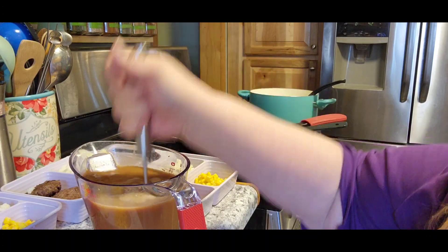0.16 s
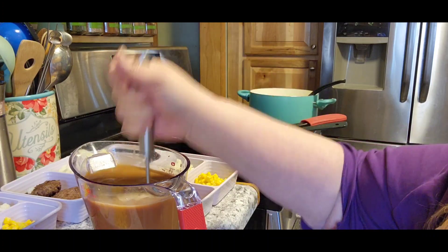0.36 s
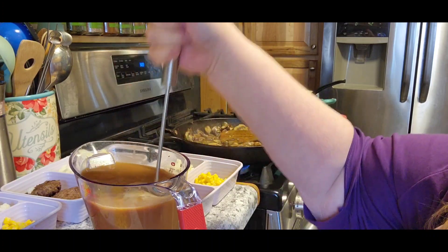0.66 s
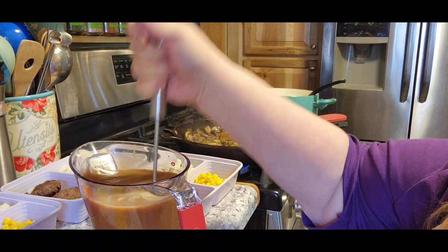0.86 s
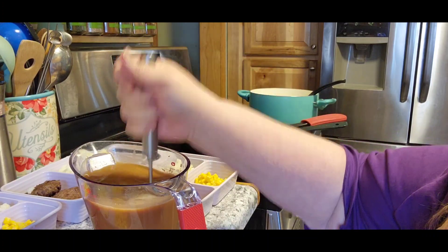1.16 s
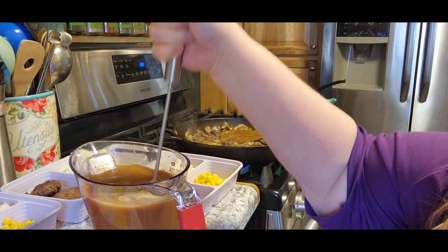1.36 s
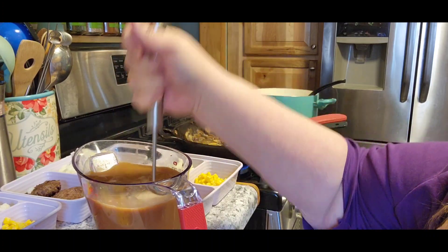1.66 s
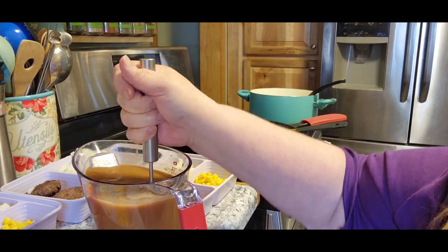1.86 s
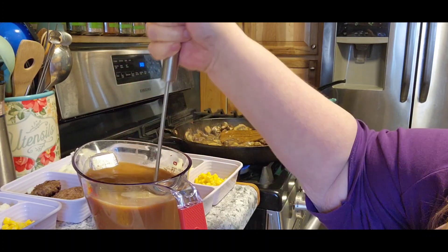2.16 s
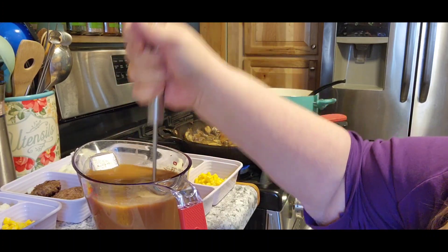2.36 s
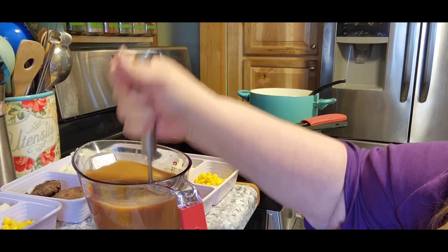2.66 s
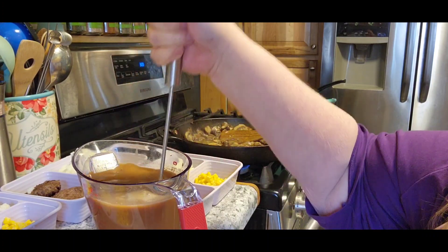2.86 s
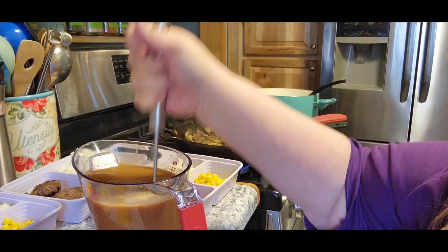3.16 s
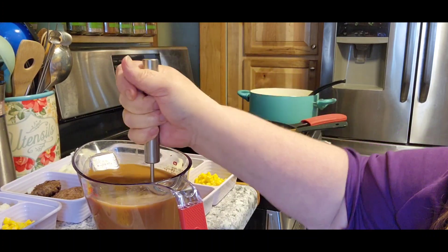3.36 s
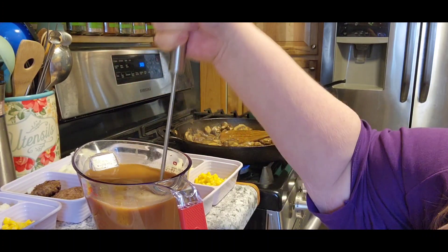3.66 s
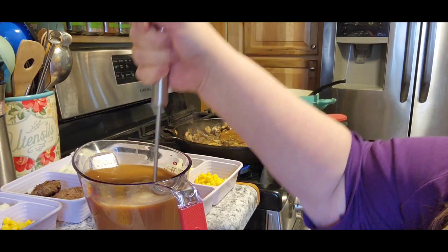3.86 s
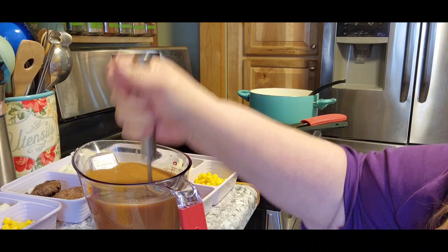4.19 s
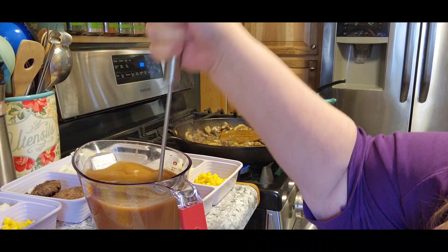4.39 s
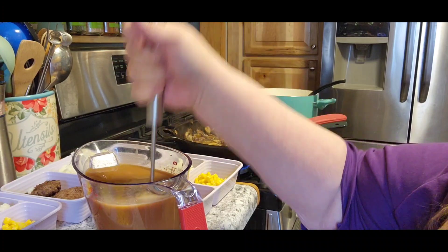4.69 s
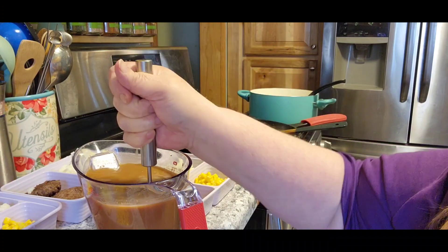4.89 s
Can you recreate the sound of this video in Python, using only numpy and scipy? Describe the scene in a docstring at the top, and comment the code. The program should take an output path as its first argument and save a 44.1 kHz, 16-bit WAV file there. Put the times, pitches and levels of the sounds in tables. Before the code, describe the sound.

A push-down metal whisk works in a glass cup of thin gravy, close to stereo microphones in a small kitchen with a short echo. Right at the start the steel handle hits its top stop with a sharp, briefly ringing clack. These clacks are the loudest sounds and return at about 0.8, 1.6, 2.3, 3.1, 3.9 and 4.7 seconds. After each, the handle is pushed down the spiral shaft with a hissing, chattering rasp, and the spinning wires make a low, wavering drone over the rumble of stirred liquid. Each push ends in a dull knock on the bottom, at about 0.3, 1.2, 1.9, 2.6, 3.4, 4.2 and 4.9 seconds, the last two heavier. Between pushes the spring drives the handle back up with another rasp and light rattles. The sound ends on the seventh push, around five seconds in. An appliance hums faintly throughout.

```python
"""A small kitchen, a stereo pair of microphones close to a glass cup of thin gravy with a push-down whisk.
First the steel handle clacks against its top stop. Pushed down, it rasps along the spiral shaft and spins
the whisk in the liquid, so that cup and counter drone, until the whisk thumps on the bottom. The spring
sends the handle rasping and rattling back up to the next clack. The seventh push ends on the bottom,
five seconds in. Behind it all, an appliance hums faintly."""
import sys
import numpy as np
from scipy import signal
from scipy.fft import rfft, irfft, next_fast_len
from scipy.io import wavfile
from scipy.ndimage import map_coordinates

SR = 44100
rng = np.random.default_rng(int(sys.argv[2]) if len(sys.argv) > 2 else 0)


def pcm_store(signal):
    """Save signal as 16-bit PCM."""
    levels = np.round(np.clip(np.atleast_2d(signal), -1, 1) * 32767)
    wavfile.write(sys.argv[1], SR, levels.astype(np.int16).T)


N = 221778
TIME = np.arange(N) / SR
AGE = np.arange(SR // 2) / SR  # seconds since a blow

# The handle going down. Each row: start in seconds, time to top speed in seconds, hiss in dB,
# swell up to top speed in dB, shaft body in dB, drone in dB.
PUSHES = [(0.176, 0.084, -35.5, 11.5, -34.5, -36), (0.987, 0.15, -35, 6, -34, -29.5),
          (1.75, 0.096, -36, 6.5, -35, -30.5), (2.476, 0.11, -36.5, 3, -35, -32.5),
          (3.232, 0.09, -35, 21.5, -38, -33), (4.086, 0.064, -32, 7, -36, -38.5),
          (4.815, 0.089, -32.5, 13.5, -38, -34.5)]
# The handle springing back up. Each row: start in seconds, hiss in dB, shaft body in dB, drone in dB,
# drone of the coasting whisk in dB.
RETURNS = [(0.495, -33.5, -37, -43.5, -37.5), (1.297, -33.5, -38.5, -39.5, -44.5),
           (2.036, -35, -37, -35, -35.5), (2.785, -33.5, -38, -30, -44.5), (3.546, -33.5, -38, -34, -62),
           (4.323, -33, -35, -33, -45)]
# The spiral catching late in a return. Each row: start in seconds, hiss in dB, shaft body in dB.
CATCHES = [(0.662, -42, -45), (1.438, -53.5, -49), (2.199, -41.5, -50), (2.956, -48, -47),
           (3.704, -43.5, -51.5), (4.498, -39.5, -53.5)]
# The handle hitting its top stop. Each row: start in seconds, level in dB, treble and rebound in dB
# relative to that level, drone in dB.
CLACKS = [(0.0366, -2, -29, -7, -28), (0.81, -3, -32, -6.5, -33.5), (1.624, -0.5, -34, -17.5, -30),
          (2.341, -2, -35, -11.5, -34), (3.1075, -2.5, -45.5, -37, -30.5),
          (3.9274, -0.5, -28.5, -7.5, -27.5), (4.6886, -2, -28, -6, -27.5)]
# The whisk meeting the bottom, once a push. Each row: start in seconds, thud, knock and drone in dB.
THUMPS = [(0.326, -16, -16, -22.5), (1.168, -18.5, -16, -26), (1.896, -14, -15, -37.5),
          (2.638, -20.5, -19.5, -22.5), (3.404, -21, -33.5, -30.5), (4.169, -9, -12.5, -19),
          (4.944, -8.5, -17.5, -29.5)]
# The loose shaft knocking in the handle. Each row: start in seconds, knock in dB, bright scuff in dB.
RATTLES = [(0.174, -36.5, -37), (0.643, -22.5, -48), (0.662, -27.5, -37.5), (0.992, -22.5, -28.5),
           (1.09, -35, -28.5), (1.33, -10.5, -45.5), (1.577, -24, -65), (1.746, -21, -37),
           (2.066, -10, -44), (2.138, -17.5, -43.5), (2.232, -22, -55), (2.476, -19.5, -30),
           (2.579, -26, -24), (2.61, -23, -37), (2.783, -8.5, -35), (3.232, -38.5, -36.5),
           (3.704, -21, -32.5), (4.152, -20, -26.5), (4.349, -12, -32), (4.493, -22.5, -34),
           (4.921, -23, -25.5)]
# The ringing of whisk and cup. Each row: frequency in Hz, level in dB, time to fall 60 dB in seconds,
# left microphone minus right in dB.
WHISK_MODES = [(377.6, -11.5, 0.056, -1.5), (426, -21.5, 0.059, -9), (482, -17.5, 0.098, -3),
               (617, -25, 0.25, 1), (687, -22, 0.14, -7.5), (796, -8.5, 0.086, -1.5), (911, -20.5, 0.1, 17),
               (932, -6.5, 0.062, -3.5), (1057, -13, 0.091, -13.5), (1117, -4, 0.066, 7.5),
               (1241, -3.5, 0.066, 0), (1320, -33, 0.038, 10), (1404, -4, 0.038, -4.5),
               (1485, -6.5, 0.034, -12), (1550, -18, 0.12, 5), (1675, -12.5, 0.052, -13),
               (1870, -9.5, 0.088, 7), (2024, -9, 0.091, 2), (2039, -7.5, 0.052, -4),
               (2178, -17.5, 0.077, 15.5), (2216, -0.5, 0.014, 15.5), (2400, -23, 0.15, 2),
               (2554, -10.5, 0.05, -3.5), (2610, -2.5, 0.023, 3.5), (3000, -14.5, 0.019, 13.5),
               (3590, -27.5, 0.099, 3.5), (3920, -15, 0.023, 5)]
# Resonances of the rubbed steel. Each row: frequency in Hz, width in Hz, level in dB.
SHAFT_MODES = [(365, 78, -9.5), (669, 24.3, 2.5), (787, 26.6, 3), (960, 46, -2), (1095, 90, -5),
               (1532, 41, 4), (1738, 150, -6.5), (2036, 136, -4.5), (2482, 33, -10)]  # the body of the shaft
ROD_MODES = [(3278, 110, 1), (3390, 48, -3.5), (3675, 22, 3), (3813, 60, -3), (4270, 24, -3.5),
             (5340, 68, 0.5), (5610, 120, -2.5), (6350, 47, -15.5), (6300, 15, -9.5), (7200, 130, -5),
             (7490, 77, -4)]  # the thin singing of the rod
# Noise spectra. Each row: frequency in Hz, relative spectral density in dB.
HISS_SPECTRUM = [(300, -16), (900, -34.5), (2300, -10.5), (2950, -3.5), (3450, 4.5), (4000, -0.5),
                 (4700, -1.5), (5500, 2), (6700, -4.5), (7700, -3.5), (9000, -15), (10800, -13.5),
                 (13500, -10), (16000, -20)]  # steel rubbing on steel
FIZZ_SPECTRUM = [(4000, -34.5), (6500, 8), (9000, -1), (10800, -13.5), (13300, 1), (14800, -9),
                 (16000, -5.5)]  # the top of a fast rasp
BLOW_SPECTRUM = [(150, -38), (250, -15.5), (400, -15), (600, -13), (1100, 10.5), (1350, -7), (1700, -22.5),
                 (2080, -5.5), (2600, -5.5), (3050, -17.5), (6000, -19), (10000, -48.5), (16000, -47.5)]  # the crack of a contact
TICK_SPECTRUM = [(800, -16), (2500, 3.5), (4000, -4.5), (7500, 4), (10000, -7.5), (14000, -4), (16000, -22)]  # its bright edge
CLATTER_SPECTRUM = [(230, -25.5), (400, -15), (650, -6), (1100, -9.5), (1700, -8), (2050, 1), (2500, -16),
                    (3000, -16.5), (6000, -22.5), (16000, -62.5)]  # what hangs on after the top stop
THUD_SPECTRUM = [(100, -18.5), (230, -8), (290, -3), (420, -4), (600, -4), (1000, -4), (2500, -44.5)]  # the cup on the counter
RUMBLE_SPECTRUM = [(25, -19), (50, -18.5), (75, -10.5), (100, -2), (125, -6.5), (160, -5.5), (200, -17),
                   (245, -23), (340, -22.5), (600, -26.5), (1500, -44)]  # stirred liquid
AIR_SPECTRUM = [(20, -3.5), (60, -6.5), (130, -5), (200, -0.5), (300, -26), (800, -13.5), (2000, -18),
                (7000, -26.5), (16000, -36)]  # room tone
# How alike the two microphones sound. Each row: frequency in Hz, coherence from 0 to 1.
MIC_COHERENCE = [(25, 1), (60, 0.95), (140, 0.96), (280, 0.88), (600, 0.57), (1500, 0.39), (3000, 0.39),
                 (6000, 0.17), (14000, 0.083)]
# The kitchen's decay. Each row: frequency in Hz, time to fall 60 dB in seconds.
KITCHEN_DECAY = [(120, 0.26), (500, 0.22), (2000, 0.22), (6000, 0.24), (15000, 0.09)]


def top_stop(rebound_s=0.011):
    """The spring throws the handle against its stop: a crack, a rebound, clatter and a ringing whisk."""
    out = np.zeros((2, N))
    contact = 1 - np.exp(-(AGE / 0.0015) ** 2)  # the force builds over a millisecond or two
    for s, db, treble_db, rebound_db, _ in CLACKS:
        crack = amp(-10.5) * burst(BLOW_SPECTRUM, t60=0.039)
        clatter = amp(-20) * burst(CLATTER_SPECTRUM, t60=0.2)
        tick = amp(treble_db) * burst(TICK_SPECTRUM, t60=0.11)
        body = amp(-5.5) * whisk_ring(vary_db=1.2, scatter_rad=0.35, mic_skew_rad=0.42)
        hit = contact * (body + crack + clatter + tick)
        add(out, s, amp(db) * (hit + amp(-12.5) * kitchen_reverb(hit)))
        add(out, s + rebound_s, amp(db + rebound_db) * contact * burst(BLOW_SPECTRUM, t60=0.03))
    return out


def whisk_ring(vary_db, scatter_rad, mic_skew_rad):
    """Whisk and cup ring after a blow; each mode reaches each microphone at its own level and phase."""
    hz, db, t60, pan_db = np.transpose(WHISK_MODES)[:, :, None]
    level, phase, skew = rng.standard_normal((3, len(WHISK_MODES), 1))
    sign = (-1) ** np.arange(len(WHISK_MODES))[:, None]  # neighbouring modes swing opposite ways
    angle = 2 * np.pi * hz * AGE + scatter_rad * phase
    decays = sign * amp(db + vary_db * level) * fade(t60)
    mics = [(decays * amp(side * pan_db / 2) * np.sin(angle + side * mic_skew_rad * skew)).sum(0)
            for side in (1, -1)]
    return np.array(mics) * (1 - np.exp(-AGE / 0.0018))


def spiral_rasp(hiss, body, hiss_db, fizz_db, rod_db, body_db, chatter_db, slips_per_s):
    """The handle rubs along the spiral: steel hiss, singing rod and shaft body, chattering as it turns."""
    chatter = amp(chatter_db * wobble(130) + 0.35 * wobble(30))
    force = chatter * travelling_contact(friction(slips_per_s))
    steel = spread(force, lambda hz: amp(along(HISS_SPECTRUM, hz)))
    rod = spread(force[::-1], lambda hz: resonances(ROD_MODES, hz))
    shaft = spread(force, lambda hz: resonances(SHAFT_MODES, hz))
    speed = np.minimum(hiss / amp(-33.5), 1.2) ** 1.2  # the top octave opens when the stroke is fastest
    fizz = speed * spread(force * amp(2.5 * wobble(150)), lambda hz: amp(along(FIZZ_SPECTRUM, hz)))
    treble = amp(hiss_db) * steel + amp(fizz_db) * fizz + amp(rod_db) * rod
    return hiss * treble + amp(body_db) * body * shaft


def friction(slips_per_s, spike_db=4.5, rub_gain=0.84):
    """Friction force: tiny slips of uneven size over smooth rubbing."""
    slipping = rng.random(N) < slips_per_s / SR
    size = np.minimum(rng.exponential(size=N), 3)
    slips = slipping * amp(spike_db * size) * rng.choice([-1, 1], (2, N))
    return unit(slips) + rub_gain * rng.standard_normal((2, N))


def travelling_contact(force, depth_db=3):
    """Narrow peaks and dips come and go as the contact point travels along the rod."""
    spectra = signal.stft(force, nperseg=1024)[2]
    patch = np.outer(np.hanning(7), np.hanning(11))
    ripple = signal.fftconvolve(rng.standard_normal(spectra.shape[1:]), patch, "same")
    return signal.istft(spectra * amp(depth_db * unit(ripple)), nperseg=1024)[1][:, :N]


def push_levels(ease_db_per_s=35, body_swell=0.65, drone_swell=0.35):
    """Hiss, body and drone gains: the hand speeds up, eases against the spring and stops at the bottom."""
    hiss, body, drone = np.zeros((3, N))
    for (s, rise_s, hiss_db, swell_db, body_db, drone_db), (bottom_s, *_) in zip(PUSHES, THUMPS):
        slow_db = swell_db * np.clip(1 - (TIME - s) / rise_s, 0, 1)
        ease_db = ease_db_per_s * np.maximum(TIME - s - rise_s, 0)
        travel_s = bottom_s - s
        hiss += amp(hiss_db - slow_db - ease_db) * envelope(s, 0.16, travel_s, release_s=0.031)
        body += amp(body_db - body_swell * slow_db) * envelope(s, 0.24, travel_s, release_s=0.137)
        drone += amp(drone_db - drone_swell * slow_db) * envelope(s, 0.12, travel_s, release_s=0.34)
    return hiss, body, drone


def return_levels(hold_s=0.065, gather_s=0.028, gather_db=2.5):
    """Hiss and body gains: the spring starts the handle at once, then it slows and catches near the top."""
    hiss, body = np.zeros((2, N))
    for s, hiss_db, body_db, *_ in RETURNS:
        slow_db = gather_db * np.clip(1 - (TIME - s) / gather_s, 0, 1)
        hiss += amp(hiss_db - slow_db) * envelope(s, attack_s=0.058, hold_s=hold_s, release_s=0.25)
        body += amp(body_db - 2.4 * slow_db) * envelope(s, attack_s=0.063, hold_s=hold_s, release_s=0.31)
    for s, hiss_db, body_db in CATCHES:
        hiss += amp(hiss_db) * envelope(s, attack_s=0.042, hold_s=0.013, release_s=0.13)
        body += amp(body_db) * envelope(s, attack_s=0.063, hold_s=0.013, release_s=0.18)
    return hiss, body


def bottom_thumps():
    """The end of each push knocks the shaft and goes through the cup into the counter as a dull thud."""
    out = np.zeros((2, N))
    for s, thud_db, knock_db, _ in THUMPS:
        thud = amp(thud_db - 12) * burst(THUD_SPECTRUM, t60=0.067) * (1 - np.exp(-AGE / 0.004))
        add(out, s, thud + shaft_knock(knock_db))
    return out


def shaft_rattles():
    """Play between shaft and handle gives light knocks and scuffs as the spiral catches and lets go."""
    out = np.zeros((2, N))
    for s, knock_db, scuff_db in RATTLES:
        scuff = amp(scuff_db) * burst(TICK_SPECTRUM, t60=0.049) * (1 - np.exp(-AGE / 0.0012))
        add(out, s, shaft_knock(knock_db) + scuff)
    return out


def shaft_knock(db):
    """One light contact between shaft and handle, briefly ringing the whisk."""
    body = whisk_ring(vary_db=2.5, scatter_rad=1.2, mic_skew_rad=0.5) * fade(0.17)
    return amp(db) * (amp(-13.5) * body + amp(-19.5) * burst(BLOW_SPECTRUM, t60=0.06))


def churn(drone_hz=125, waver=0.0238, sag=0.1477, press_s=0.01515, return_lag_s=0.02, coast_s=0.2):
    """The turning wires keep cup and counter droning over the rumble of stirred liquid."""
    stirred = push_levels()[2]
    for s, *_, db, coast_db in RETURNS:
        stirred += amp(db) * envelope(s + return_lag_s, attack_s=0.12, hold_s=0.015, release_s=0.37)
        stirred += amp(coast_db) * envelope(s + coast_s, attack_s=0.34, hold_s=0.02, release_s=0.39)
    for s, *_, db in CLACKS:
        stirred += amp(db) * envelope(s, attack_s=0.057, hold_s=0.035, release_s=0.36)
    pressed, drag = np.zeros((2, N))
    for s, *_, db in THUMPS:  # pressed on the bottom, the whisk drones louder and slows
        pressed += amp(db) * envelope(s, attack_s=0.12, hold_s=0.004, release_s=0.2)
        drag += np.exp(-((TIME - s - 0.008) / press_s) ** 2)
    pitch_hz = drone_hz * (1 + waver * wobble(22) - sag * drag)
    drone = np.sin(2 * np.pi * np.cumsum(pitch_hz) / SR) * amp(1.9 * wobble(35))
    rumble = noise(RUMBLE_SPECTRUM, N)
    return (amp(-6.5) * stirred + pressed) * drone + (amp(-5.5) * stirred + amp(-9.5) * pressed) * rumble


def kitchen_reverb(direct, build_s=0.0034):
    """A dense tail off cabinets and walls reaches the microphones a few milliseconds late."""
    hz, t, spectra = signal.stft(rng.standard_normal((2, SR // 2)), SR, nperseg=256)
    decay = 1000 ** (-t / along(KITCHEN_DECAY, hz)[:, None])
    tail = signal.istft(spectra * decay, SR, nperseg=256)[1][:, :len(AGE)]
    tail *= 1 - np.exp(-(AGE / build_s) ** 2)
    tail = spread(tail, np.ones_like) / np.sqrt(len(AGE))
    return signal.fftconvolve(direct, tail, axes=1)[:, :direct.shape[-1]]


def room_tone(hum_hz=120):
    """The kitchen's air and the hum of an appliance in the background."""
    return amp(-57) * noise(AIR_SPECTRUM, N) + amp(-63.5) * np.sin(2 * np.pi * hum_hz * TIME)


def amp(db):
    """Decibels to gain."""
    return 10 ** (np.asarray(db) / 20)


def unit(x):
    """Scale to rms 1."""
    return x / np.sqrt(np.mean(x ** 2) + 1e-20)


def along(points, hz):
    """(Hz, value) points read on a log axis."""
    knots_hz, values = np.transpose(points)
    return np.interp(np.log(hz + 1), np.log(knots_hz + 1), values)


def wobble(rate):
    """A smooth random curve, rate knots a second."""
    return map_coordinates(rng.standard_normal(int(N * rate / SR) + 4), [TIME * rate])


def filtered(x, response):
    """Filter x by a response given as a function of frequency."""
    size = x.shape[-1]
    padded = next_fast_len(size + 8192)
    return irfft(rfft(x, padded) * response(np.fft.rfftfreq(padded, 1 / SR)), padded)[..., :size]


def resonances(modes, hz):
    """Summed response of resonances of alternating sign."""
    return sum((-1) ** k * amp(db) * 1j * hz * width / (centre ** 2 - hz ** 2 + 1j * hz * width)
               for k, (centre, width, db) in enumerate(modes))


def spread(pair, response):
    """Two unrelated signals become a coloured, partly alike microphone pair of rms 1."""
    def mid_side(hz):
        turn = np.arccos(np.clip(along(MIC_COHERENCE, hz), 0, 1)) / 2
        return response(hz) * np.array([np.cos(turn), np.sin(turn)])
    mid, side = filtered(pair, mid_side)
    return unit(np.array([mid + side, mid - side]))


def noise(spectrum, size):
    """Stereo noise with a given spectrum."""
    return spread(rng.standard_normal((2, size)), lambda hz: amp(along(spectrum, hz)))


def fade(t60):
    """Free decay after a blow, 60 dB in t60 seconds."""
    return 1000 ** (-AGE / t60)


def burst(spectrum, t60):
    """Stereo noise dying away after a blow."""
    return noise(spectrum, len(AGE)) * fade(t60)


def envelope(s, attack_s, hold_s, release_s):
    """Rises by 60 dB in the attack up to time s, holds at 1, falls by 60 dB in the release."""
    return 1000 ** -(np.maximum(s - TIME, 0) / attack_s + np.maximum(TIME - s - hold_s, 0) / release_s)


def add(track, s, sound):
    """Mix a sound into the track at time s."""
    start = max(round(s * SR), 0)
    part = sound[..., :N - start]
    track[:, start:start + part.shape[-1]] += part


def scene():
    """The whisk close to the microphones, the kitchen around it."""
    down = spiral_rasp(*push_levels()[:2], hiss_db=-2, fizz_db=-7, rod_db=-6, body_db=-2.5,
                       chatter_db=1.74, slips_per_s=1200)
    up = spiral_rasp(*return_levels(), hiss_db=-3, fizz_db=-16, rod_db=-10.5, body_db=0.5,
                     chatter_db=1, slips_per_s=2600)
    near = down + up + shaft_rattles() + bottom_thumps()
    return top_stop() + near + amp(-12) * kitchen_reverb(near) + churn() + room_tone()


def record(dry):
    """The loudest peaks are rounded off at full scale; nothing passes above 16 kHz."""
    rounded = dry / (1 + np.abs(dry) ** 6) ** (1 / 6)
    return filtered(rounded, lambda hz: hz < 16000)


dry = scene()
out = record(dry)
pcm_store(out)
```